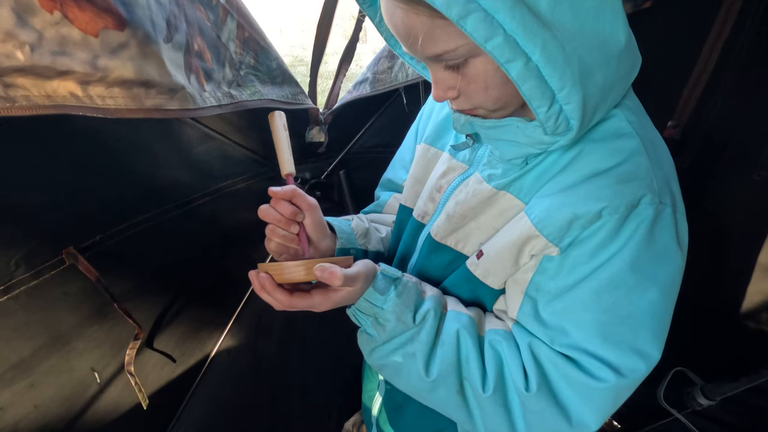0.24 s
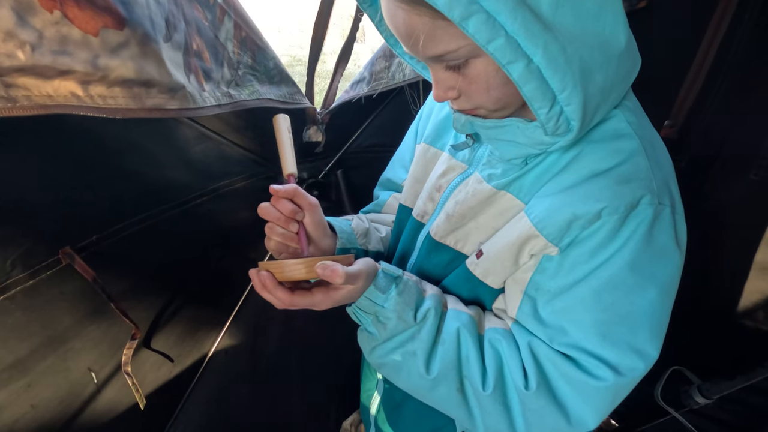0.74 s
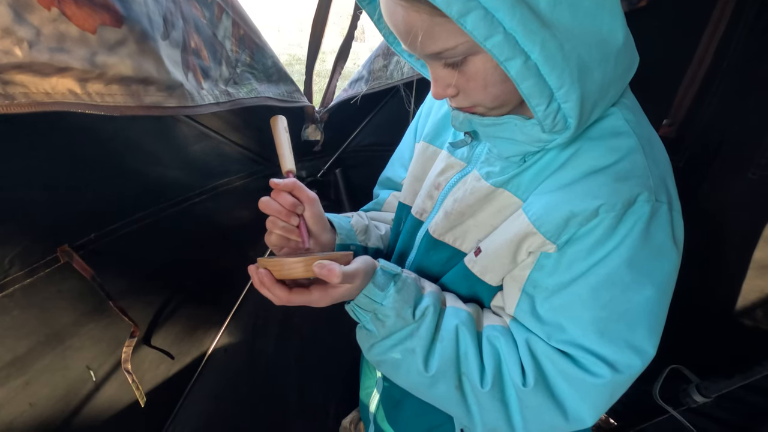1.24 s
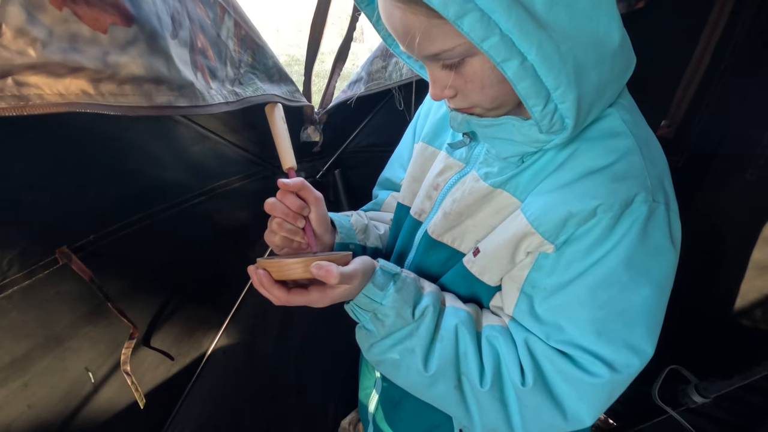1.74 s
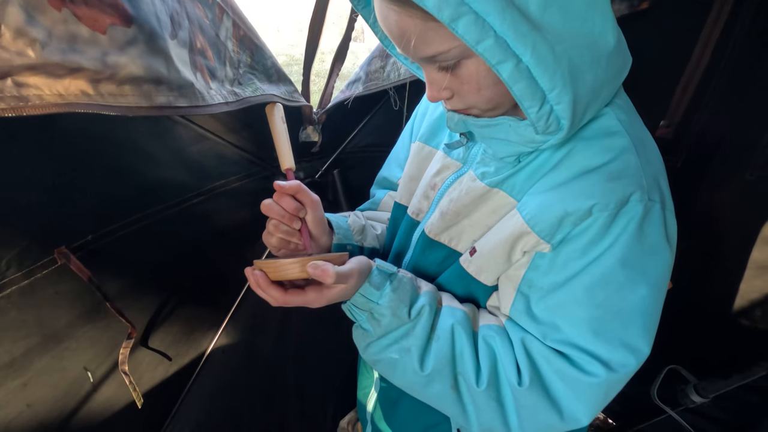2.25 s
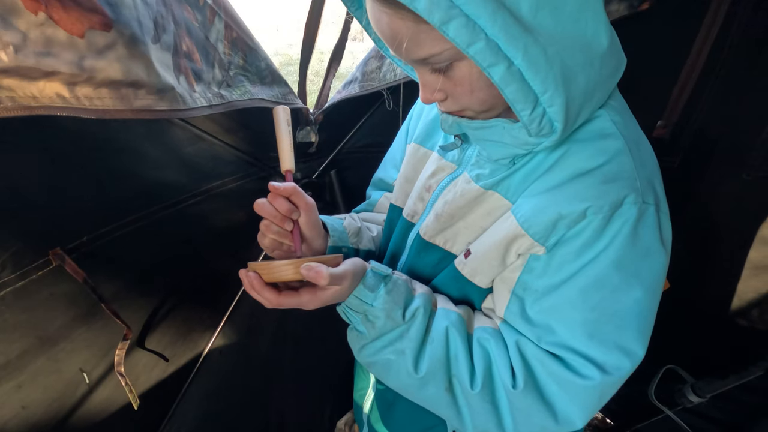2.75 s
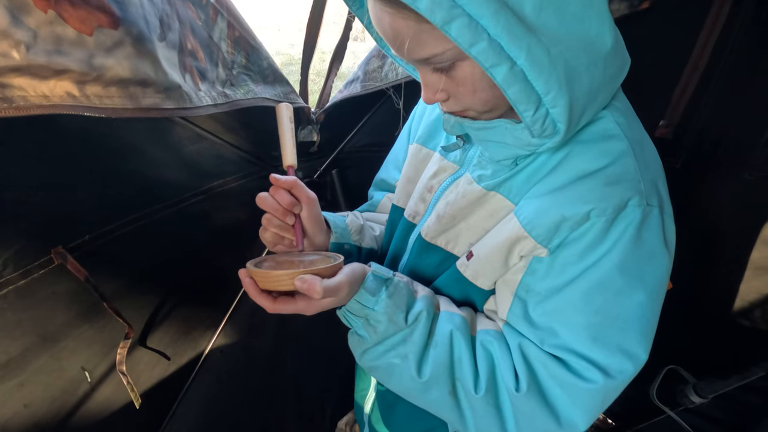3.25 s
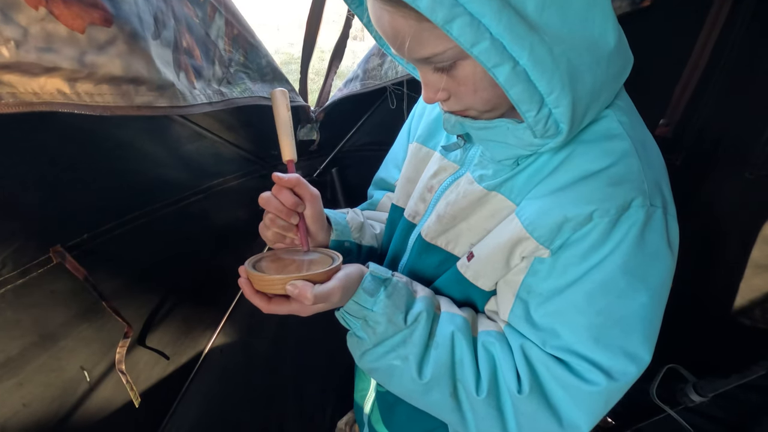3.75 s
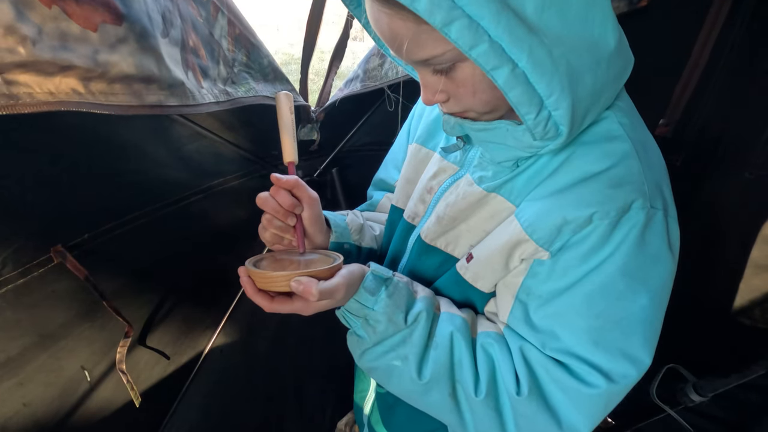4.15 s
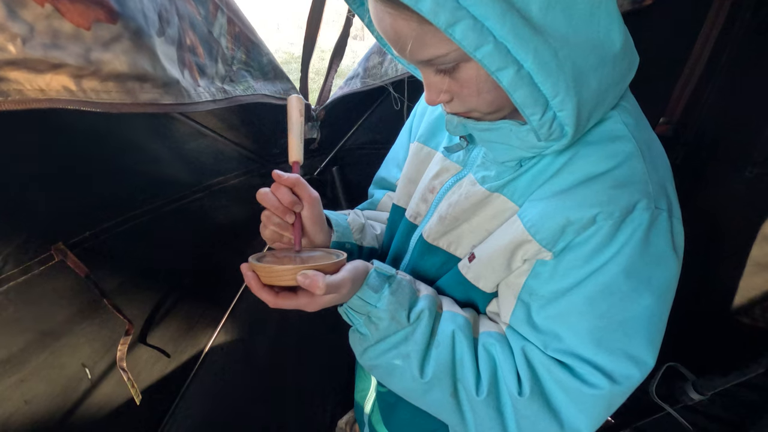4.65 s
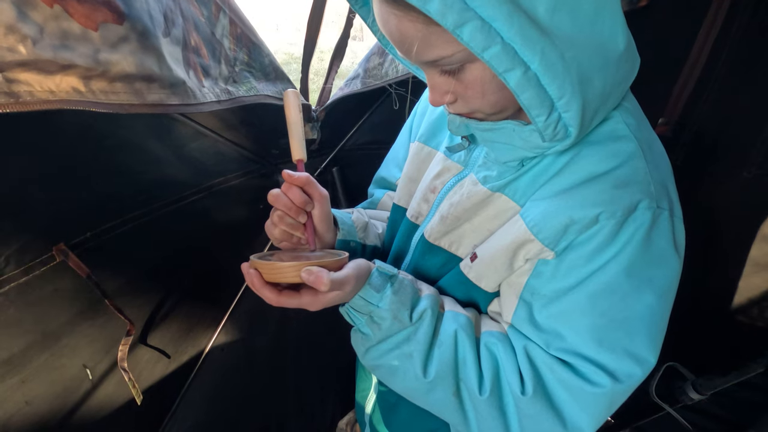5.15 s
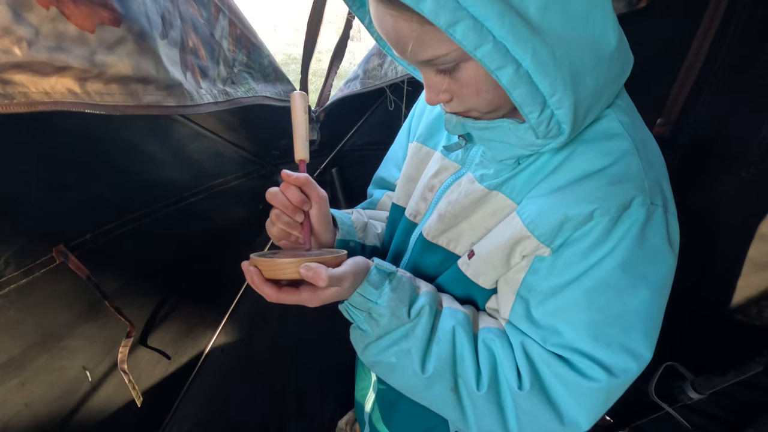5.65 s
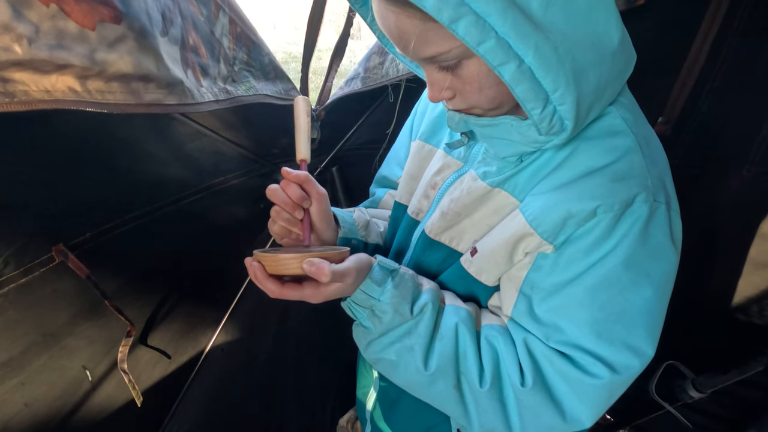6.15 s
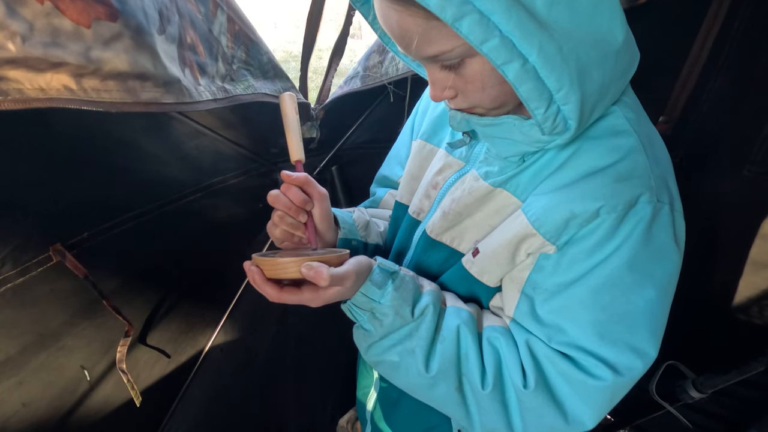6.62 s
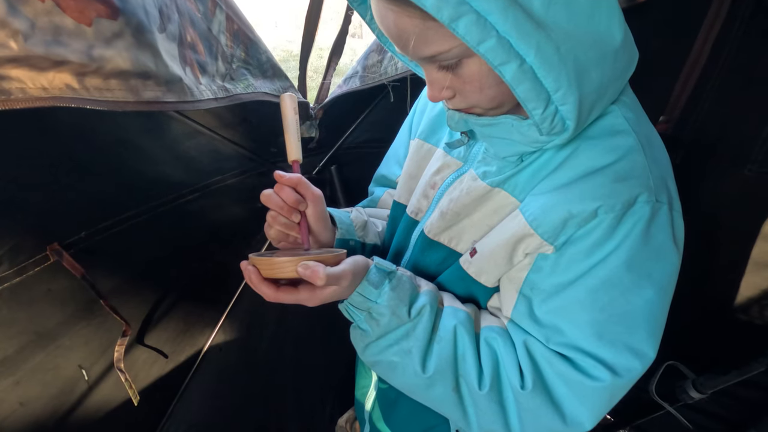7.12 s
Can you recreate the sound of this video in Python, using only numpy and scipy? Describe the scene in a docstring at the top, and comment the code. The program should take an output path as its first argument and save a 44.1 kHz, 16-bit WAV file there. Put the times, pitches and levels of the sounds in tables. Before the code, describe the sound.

A wooden striker scrapes a pot call close by, making raspy turkey-like yelps, then runs of squeaks, clucks and one short whine.

```python
"""Inside a cloth hunting blind, a wooden striker scrapes a round pot call.
Four raspy yelps come first, then runs of squeaks and clucks and one long whine.
The tip sticks and slips; pressing harder slows the slips until they turn ragged, and every slip rings the pot.
A sleeve rustles softly throughout and swells once between two runs, with a few small knocks.
Far bird notes, quiet air and faint wavering hums come from outside."""
import sys
import numpy as np
from scipy import signal
from scipy.fft import rfft, irfft, next_fast_len
from scipy.io import wavfile
from scipy.ndimage import uniform_filter1d

SR = 44100
rng = np.random.default_rng(int(sys.argv[2]) if len(sys.argv) > 2 else 0)


def dump_mix(stems):
    """Bounce the given channels to the path in sys.argv[1] as a 16-bit WAV at rate SR."""
    frames = np.atleast_2d(stems).T  # one column per channel
    limited = np.clip(frames, -1, 1)  # hard clip at full scale
    pcm = np.round(limited * 32767).astype(np.int16)
    wavfile.write(sys.argv[1], SR, pcm)


N = 325458  # length in samples
EDGE_HZ = 13900  # upper limit of the sound


def gain_of(db):
    """Turns decibels into a factor."""
    return 10 ** (np.asarray(db) / 20)


def evened(x):
    """Scales a sound to an rms of 1."""
    return x / np.sqrt(np.mean(x ** 2) + 1e-20)


def read(points, hz):
    """Reads a table of (frequency, value) between its points, on a log-frequency axis."""
    f, value = np.transpose(points)
    return np.interp(np.log(hz + 1), np.log(f + 1), value)


def tinted(x, colour):
    """Colours a sound with a table of (f/Hz, gain/dB)."""
    size = next_fast_len(len(x) + 512)
    gain = gain_of(read(colour, np.fft.rfftfreq(size, 1 / SR)))
    return irfft(rfft(x, size) * gain, size)[:len(x)]


def add(mix, s, sound):
    """Adds a sound into the mix at time s, in seconds."""
    part = mix[max(round(s * SR), 0):][:len(sound)]
    part += sound[:len(part)]


def band_noise(n, hz, octaves):
    """Noise of rms 1 in a soft band around hz."""
    away = np.log2((np.fft.rfftfreq(n, 1 / SR) + 1) / hz) / octaves
    return evened(irfft(rfft(rng.standard_normal(n)) / (1 + away ** 4), n))


def outdoors(side_db=-9, waver=0.016):
    """Quiet air is coloured noise; far hums are sine tones that waver in pitch and strength."""
    # colour of the air: (f/Hz, density/dB)
    air_colour = [(15, -33), (25, 4.5), (52, -4), (91, -9), (168, -7), (326, -18.5), (703, -26), (802, -32),
                  (1100, -23), (2190, -40), (7000, -55), (10000, -64.5), (14000, -68)]
    air_db = -69
    # distant hums: (start/s, end/s, f/Hz, level/dB)
    hum_list = [(2.201, 4.194, 73.5, -64), (3.701, 5.378, 74.85, -70.5), (5.538, 6.206, 76.5, -72.5),
                (1.699, 2.714, 153.6, -73.5), (2.146, 2.708, 454, -74), (6.462, 6.851, 498, -83)]
    colour = gain_of(read(air_colour, np.fft.rfftfreq(N, 1 / SR)))
    air = irfft(rfft(rng.standard_normal((2, N))) * colour, N)
    mid, side = gain_of(air_db) * evened(air)
    for start, end, hz, db in hum_list:
        n = int((end - start) * SR)
        wavering_hz = hz * (1 + waver * band_noise(n, 15, 0.75))
        tone = np.sin(2 * np.pi * np.cumsum(wavering_hz) / SR)
        strength = (1 + .35 * band_noise(n, 6, 1.0)) * signal.windows.tukey(n, .5)
        add(mid, start, gain_of(db) * evened(tone * strength))
    side = gain_of(side_db) * side
    return np.array([mid + side, mid - side])  # left, right


def whistle(length, hz_in, hz_mid, hz_out):
    """A soft bird note: a sine on a bent, slightly shaky pitch."""
    u = np.linspace(-1, 1, int(length * SR))
    hz = hz_mid + (hz_out - hz_in) / 2 * u + ((hz_in + hz_out) / 2 - hz_mid) * u ** 2
    hz = hz * (1 + .012 * band_noise(len(u), 120, 1.2))
    return evened(np.sin(2 * np.pi * np.cumsum(hz) / SR) * signal.windows.tukey(len(u), .35))


def birds(chip_spread_db=2, direct_db=-4):
    """Far birds, smeared by the trees: falling notes and evenly spaced chips."""
    # single notes: (start/s, length/s, start f/Hz, middle f/Hz, end f/Hz, level before smearing/dB)
    note_list = [(3.12, .13, 2950, 2680, 2480, -67), (3.39, .13, 2830, 2620, 2420, -70),
                 (5.26, .11, 3050, 2820, 2830, -72)]
    # a second bird's runs of arched chips: (first chip t/s, last chip t/s, mean level before smearing/dB)
    chip_runs = [(4.867, 5.475, -74), (6.332, 6.70, -74.5)]
    chip_gap_s = .122
    notes, chips = np.zeros(N), np.zeros(N)
    for s, length, hz_in, hz_mid, hz_out, db in note_list:
        add(notes, s, gain_of(db) * whistle(length, hz_in, hz_mid, hz_out))
    for first, last, db in chip_runs:
        for s in np.arange(first, last + chip_gap_s / 2, chip_gap_s):
            chip = whistle(rng.uniform(.035, .05), 2440, 2690, 2380)
            chip_db = db + chip_spread_db * rng.standard_normal()
            add(chips, s - len(chip) / SR / 2, gain_of(chip_db) * chip)
    # the echo is fading noise that would drop 60 dB in 0.7 s, cut off after half a second
    t = np.arange(SR // 2) / SR
    trees = rng.standard_normal(len(t)) * gain_of(-60 * t / .7)
    echo = signal.fftconvolve(notes + chips / 4, trees / np.linalg.norm(trees))[:N]
    return gain_of(direct_db) * (notes + chips) + echo


def handling(sleeve_db=-72, knock_decay_s=0.0085):
    """Dull knocks are short noise bursts; a sleeve brushing as the pot is tilted is swelling noise."""
    # small knocks of hand and pot: (t/s, level before rise and decay/dB, centre f/Hz)
    knock_list = [(1.543, -70, 1398), (3.301, -58.5, 3200), (5.118, -55, 232), (5.177, -56, 180),
                  (5.242, -63, 230)]
    out, t = np.zeros(N), np.arange(SR // 10) / SR
    for s, db, hz in knock_list:
        rise = 1 - np.exp(-t * hz)
        decay = np.exp(-t / knock_decay_s * np.sqrt(hz / 1000))  # higher knocks die sooner
        add(out, s, gain_of(db) * band_noise(len(t), hz, 0.78) * rise * decay)
    brush = np.interp(np.arange(N) / SR, [3.2, 3.31, 3.45, 3.62], [0.21, 1, 0.68, 0.26])
    return out + gain_of(sleeve_db) * brush * band_noise(N, 2100, 1.8)


def pot_ring():
    """The pot's answer to one slip, built from its resonances so that nothing sounds before the slip."""
    # broad response of pot and striker together: (f/Hz, gain/dB)
    body_curve = [(300, -51.5), (480, -43), (640, -41), (815, -37), (1230, -21), (1480, -8.5), (2020, -8),
                  (2250, -18.5), (3450, -28.5), (4700, -20.5), (5600, -32.5), (7900, -41), (9100, -55),
                  (10200, -53), (13500, -60.5)]
    # resonances rising over that curve: (f/Hz, width/Hz, rise/dB)
    resonances = [(685, 15, 3.5), (1008.3, 64, 24.5), (1583, 140, 14), (1795.4, 99, 15), (2170, 210, 5.5),
                  (2250, 70, 6), (2531, 80, 15), (2794, 88, 9.5), (3205, 15, 6), (3912, 150, 9),
                  (4395, 80, 13.5), (7700, 160, 8.5)]
    size = 8192
    hz = abs(np.fft.fftfreq(size, 1 / SR))
    peaks = sum((gain_of(db) ** 2 - 1) / (1 + (2 * (hz - f) / w) ** 2) for f, w, db in resonances)
    log_gain = np.log(gain_of(read(body_curve, hz)) * np.sqrt(np.maximum(1 + peaks, .1)))
    # this phase (minimum phase) packs the sound as early as it can be
    spectrum = np.exp(np.conj(signal.hilbert(log_gain)))
    return np.fft.ifft(spectrum).real[:size // 2]


def slip_train(t, hz, rough, jitter=0.12, uneven=0.26, alternate=0.42):
    """Stick-slip pulses: the rougher the stroke, the more the slips differ in length, force and shape."""
    cycle = np.cumsum(hz) / SR
    slips = np.arange(int(cycle[-1]) + 2)
    # one random value per slip, joined by straight lines
    late, force = (np.interp(cycle, slips, rng.standard_normal(len(slips))) for _ in range(2))
    unsteady = np.interp(rough, [0, .08, .25], [.3, .8, 1.1])
    grain = unsteady * (.015 * late + .007 * band_noise(len(t), 70, 1.2))
    turns = np.cumsum(hz * (1 + grain + jitter * rough ** 2 * late)) / SR
    # a pulse train is a sum of cosines at every multiple k of the slip rate
    k = np.arange(1, int(EDGE_HZ / hz.min()) + 1)[:, None]
    # changes of shape make the upper partials waver on their own
    waver = np.array([band_noise(next_fast_len(len(t)), 50, 1.2)[:len(t)] for _ in k])
    shape = 1 + .5 * unsteady * waver * (1 - np.exp(-(k * hz / 3500) ** 2))
    pulses = (np.cos(2 * np.pi * k * turns) * shape * (k * hz < EDGE_HZ)).sum(0)
    # under a rough stroke, strong and weak slips tend to take turns
    strength = 1 + rough * (uneven * force + alternate * np.cos(np.pi * turns))
    return turns, evened(pulses) * strength


def scrape(ring, t, hz, level_db, rough, treble_db, grit_db=-21, rasp_db=-10, grit_treble_db=6,
           flutter_db=2.0, swell_s_per_db=0.001):
    """One stroke: slips and the grit that each one drags, rung through the pot."""
    # colours of a light, fast squeak, a slow, heavy rasp and a pressed, even stroke: (f/Hz, gain/dB)
    light_colour = [(950, 7.5), (1450, -19.5), (1950, 0.5), (2900, -7), (3900, -12.5), (4900, -9),
                    (6000, -6.5), (7800, -3.5), (12000, 2)]
    heavy_colour = [(1000, 2), (1500, -7), (1850, 4), (2100, -10.5), (2600, 3), (4400, 0), (6000, -3.5),
                    (13000, -1)]
    pressed_colour = [(700, 9), (1000, -3.5), (1400, -1.5), (2100, 1), (2700, 0.5), (3500, 2.5), (4500, 1),
                      (8000, -0.5)]
    turns, pulses = slip_train(t, hz, rough)
    # the grit is strongest at the start of each slip cycle
    grit = rng.standard_normal(len(t)) * evened(0.59 + np.exp(-(turns % 1) / 0.93))
    grit = tinted(grit, [(1200, -3.4), (4500, grit_treble_db)])
    loose = np.interp(rough, [0, .1], [.35, 1])
    drive = pulses + (gain_of(grit_db) * loose + gain_of(rasp_db) * rough) * grit
    # the slip rate decides the blend of the three colours
    light = np.clip((hz - 770) / 150, 0, 1)
    heavy = np.clip((680 - hz) / 180, 0, 1)
    pressed_part = (1 - light - heavy) * tinted(drive, pressed_colour)
    drive = pressed_part + light * tinted(drive, light_colour) + heavy * tinted(drive, heavy_colour)
    drive = tinted(drive, [(2100, 0.009), (4000, treble_db), (12000, 1.2 * treble_db)])
    # the faintest strokes are duller above the fundamental
    dull_db = -.3 * np.clip(-21.5 - level_db.mean(), 0, 18)
    drive = tinted(drive, [(1100, 0.0062), (1800, dull_db)])
    # the hand sets the loudness, whichever resonance the slips happen to meet
    rung = signal.fftconvolve(drive, ring)[40:40 + len(t)]
    power = uniform_filter1d(rung ** 2, size=300)
    # a faint stroke grips poorly: it swells in more slowly and flutters more
    faint_db = np.clip(-25.5 - level_db, 0, 18)
    swell_in = np.clip((t - t[0]) / (0.0051 + swell_s_per_db * faint_db[0]), 0, 1)
    grip = swell_in * np.clip((t[-1] - t) / 0.0027, 0, 1)
    flutter = flutter_db * loose * (0.5 + faint_db / 12) * band_noise(len(t), 50, 0.22)
    strength = grip * gain_of(level_db + flutter) / np.sqrt(power + 1e-12)
    return signal.fftconvolve(drive * strength, ring)


def slides(ring):
    """Without pressure the tip does not grip: it only hisses through the pot."""
    # the tip sliding: (start/s, end/s, level/dB)
    slide_list = [(0, 0.057, -64), (.16, 0.405, -63.5), (0.543, 0.709, -59), (.84, .97, -61),
                  (.96, 1.063, -58.5), (1.18, 1.318, -78), (2.74, 2.826, -70.5), (2.92, 3.02, -64.5),
                  (3.214, 3.279, -68.5), (6.214, 6.257, -73), (6.791, 6.992, -74.5)]
    # colour of the hiss: (f/Hz, gain/dB)
    hiss_colour = [(700, -5.5), (1100, -3), (1900, -3), (2600, 0), (3500, -0.5), (6000, 3), (9000, 8)]
    fade_share = 0.63  # share of a slide spent swelling and fading
    out = np.zeros(N)
    for start, end, db in slide_list:
        n = int(max(end - start, .02) * SR)
        hiss = tinted(band_noise(n, 6000, 1.7), hiss_colour) * signal.windows.tukey(n, fade_share)
        add(out, start, gain_of(db) * evened(signal.fftconvolve(hiss, ring)[:n]))
    return out


def clucks(ring):
    """Squeaks and clucks: pressing bends the pitch off that of a light touch, and it springs back at the ends."""
    # (start/s, end/s, middle f/Hz, glide start to end/Hz, level in the middle/dB,
    #  swell start to end/dB, treble at 4 kHz/dB, roughness 0-1)
    stroke_list = [(0.833, 0.863, 819, 21.5, -25.5, -5, -0.5, 0.36),
                   (2.191, 2.241, 1015, -57, -45, 7, 5, 0.17),
                   (2.247, 2.309, 922, 38.5, -42.5, -5.5, 5.5, 0.31),
                   (2.333, 2.35, 938, 150, -37.5, 6, 5.5, 0.2),
                   (2.363, 2.416, 921, 59.5, -33.5, 15.5, 7, 0.22),
                   (2.419, 2.508, 962, 89.5, -28.5, 8.5, 8, 0.16),
                   (2.532, 2.588, 969.5, 0, -21.5, 4, 5.5, 0.1),
                   (2.678, 2.731, 763, 36, -18.5, -1, 2, 0.26), (2.869, 2.927, 717, 80, -20, 1, -1.5, .36),
                   (3.02, 3.074, 688, 109, -23.5, -3.5, -6.5, 0.2),
                   (3.672, 3.682, 874, 49.5, -42, 3.5, -16.5, 0.63),
                   (3.745, 3.779, 890, 104, -65.5, -16, -1, .5),
                   (3.992, 4.027, 1037, 173, -28.5, -3.5, 0.5, 0.04),
                   (4.051, 4.094, 1037, -50.5, -22.5, -2.5, 1, 0.05),
                   (4.141, 4.159, 907, 107.5, -20, 4.5, -4, 0.03),
                   (4.174, 4.204, 927, 22.5, -19.5, 2.5, -2, .08),
                   (4.236, 4.284, 962, 92, -19, -1, 0, 0.07), (4.315, 4.369, 971, 50, -19, -2.5, 2, 0.1),
                   (4.419, 4.489, 867, -22, -18.5, -3.5, -1, 0.19),
                   (4.536, 4.589, 767, -39, -19, -6, 0, 0.16),
                   (4.642, 4.691, 708.4, 29, -21.5, -2, -0.5, 0.21),
                   (4.763, 4.775, 814, -61, -35, -4.5, -2, 0.37),
                   (5.47, 5.559, 1037, 87, -41.5, 13.5, 4, 0.09),
                   (5.568, 5.626, 955, -160, -30.5, -1, 0.5, 0.13),
                   (5.659, 5.706, 921.4, 15.5, -23.5, 3, -2.5, 0.09),
                   (5.705, 5.733, 875, -2, -20.5, 2.5, -4, 0.01),
                   (5.758, 5.812, 738.5, 2.5, -20.5, -2.5, -6.5, 0.07),
                   (6.79, 6.85, 984, -120, -54.5, 2.5, -6.5, 0.04),
                   (6.969, 6.985, 896, -14, -46, 3, -2, 0.17),
                   (7.002, 7.081, 902.4, 100, -35, 6.5, 3, 0.32),
                   (7.074, 7.229, 970, 36, -30, 0.5, 3.5, 0.09),
                   (7.24, 7.261, 960, 16, -30, -11.5, 1, 0.02), (7.269, 7.32, 975, 106, -28, 6, 4.5, 0.06),
                   (7.349, 7.4, 958, -92.5, -31, -14, 3.5, 0.02)]
    free_hz, full_sag_hz = 972, 250  # pitch of a light touch, and how far full pressure lowers it
    spring_back, bend_power = 0.92, 2.3  # share of the sag undone at the ends, and how late it bends
    sag_skew = 1.12  # above 1 the pitch sinks more slowly than it springs back
    ends_db, press_ends_db = -3, 4.5  # a light stroke is loudest in its middle, a pressed one at its ends
    out = np.zeros(N)
    for start, end, hz_mid, glide_hz, db, swell_db, treble_db, rough in stroke_list:
        t = np.arange(start, max(end, start + 0.01), 1 / SR)
        u = 2 * np.linspace(0, 1, len(t)) ** sag_skew - 1  # -1 at the start, 1 at the end
        sag_hz = free_hz - hz_mid
        pressure = max(sag_hz / full_sag_hz, 0)
        hz = hz_mid + glide_hz * u / 2 + spring_back * sag_hz * abs(u) ** bend_power
        level = db + swell_db * u / 2 + (ends_db + press_ends_db * pressure) * u ** 2
        add(out, start, scrape(ring, t, hz, level, rough, treble_db))
    return out


def whine(ring, treble_db=-2, trim_db=0.5, overhang_s=0.0022):
    """One long pressed stroke whose slips quicken wherever the hand eases."""
    # path of the whine: (t/s, slip rate f/Hz, level before the trim/dB)
    path = [(5.85, 711, -21.5), (5.88, 681.5, -26.5), (5.892, 703, -25), (5.912, 791, -19.5),
            (5.938, 706.8, -25.5), (6.044, 702, -27.5), (6.074, 750.2, -20.5), (6.114, 720, -24.5),
            (6.168, 704, -31), (6.178, 757.4, -27.5), (6.186, 866, -27)]
    # it starts rough, then the tip settles
    settled_rough, catch_rough, catch_s = 0.036, 0.5, 0.019
    out = np.zeros(N)
    s, hz, db = np.transpose(path)
    t = np.arange(s[0] - overhang_s, s[-1] + overhang_s, 1 / SR)
    hz, db = (np.interp(t, s, column) for column in (hz, db))
    rough = settled_rough + catch_rough * np.exp(-(t - t[0]) / catch_s)
    add(out, t[0], scrape(ring, t, hz, db + trim_db, rough, treble_db))
    return out


def yelps(ring, treble_db=-1.5):
    """A falling squeal drops into a rasp, each step locking to a slower share of the pot's ring."""
    # (start/s, tip bites t/s, turns ragged t/s, hand lets go t/s, fade length/s, level once bitten/dB,
    #  roughness of the bite 0-1)
    yelp_list = [(0.045, 0.084, 0.13, 0.18, .008, -16, 0.24), (0.392, 0.42, 0.45, 0.49, .035, -18, 0.36),
                 (0.696, .728, .755, .823, .014, -17, 0.6), (1.055, 1.075, 1.076, 1.1774, .032, -15, 0.42)]
    # the slips lock to every 2nd, 3rd, 4th, then 5th swing of the pot's main resonance as the hand bears down
    lock_hz, ragged_lock_hz, jump_s = 1868, 1808, .007
    squeal_glide = .7  # share of the opening squeal spent sliding from the 2nd swing to the 3rd
    # against the yelp's level:
    squeal_start_db, squeal_end_db, tire_db, fade_db = -12, -5.5, -4, -27
    squeal_rough, ragged_rough, last_rough = 0.072, 0.48, .9
    out = np.zeros(N)
    for start, bite, ragged, let_go, fade, db, bite_rough in yelp_list:
        t = np.arange(start, let_go + fade, 1 / SR)
        # each of these steps goes from 0 to 1
        squeal = np.clip((t - start) / (squeal_glide * (bite - start)), 0, 1)
        bitten, torn = (np.clip((t - s) / jump_s + .5, 0, 1) for s in (bite, ragged))
        hz = (lock_hz + (ragged_lock_hz - lock_hz) * torn) / (2 + squeal + bitten + torn)
        opening = np.interp(t, [start, bite], [squeal_start_db, squeal_end_db])
        ending = np.interp(t, [ragged, let_go, let_go + fade], [0, tire_db, fade_db])
        level = db + (1 - bitten) * opening + ending
        rough = squeal_rough + (bite_rough - squeal_rough) * bitten
        torn_rough = np.interp(t, [ragged, let_go], [ragged_rough, last_rough])
        rough = rough + (torn_rough - rough) * torn
        add(out, start, scrape(ring, t, hz, level, rough, treble_db))
    return out


def blind(x, tail_db=-22):
    """Quick bounces off hands, jacket and cloth walls, strongest in the treble, with a short tail."""
    # how long the tail takes to fade by 60 dB: (f/Hz, fade time/s)
    fade_times = [(300, .15), (1000, .14), (2000, .15), (4500, .15), (7700, .18), (12000, .11)]
    # colour of the tail: (f/Hz, gain/dB)
    tail_colour = [(600, -7.5), (1000, 1), (1850, -0.5), (2600, 10), (3600, 8.5), (4600, 7), (6000, 8),
                   (12000, 3)]
    n = SR // 3
    t = np.arange(n) / SR
    # about 4000 random clicks a second, from 2 ms on
    taps = rng.choice([-1., 1.], (2, 2, n)) * (rng.random((2, 2, n)) < 4000 / SR) * (t > .002)
    # left and right share most clicks; the rest enter with opposite signs
    early, late = taps[:, :1] + np.array([[.4], [-.4]]) * taps[:, 1:]
    early = early * gain_of(-60 * t / .05)
    bounce = [(1000, -19), (2000, -15), (3500, -8), (8000, -6)]  # (f/Hz, gain/dB)
    early = np.array([tinted(side, bounce) for side in early / np.linalg.norm(early[0])])
    # each frequency of the tail fades at its own speed
    hz, frame_s, z = signal.stft(late, SR, nperseg=256)
    fading = gain_of(-60 * frame_s / read(fade_times, hz)[:, None])
    late = signal.istft(z * fading, SR, nperseg=256)[1][:, :n]
    late = np.array([tinted(side, tail_colour) for side in late / np.linalg.norm(late[0])])
    return signal.fftconvolve(x[None], early + gain_of(tail_db) * late, axes=1)[:, :N]


def ports(pair):
    """The two microphones hear the call with slightly different phase and level."""
    # phase by which left leads: (f/Hz, lead/rad)
    phase_lead = [(100, 0), (1000, -.38), (1400, -.1), (1800, -.5), (2700, -.75), (4500, -.6), (7700, -.55),
                  (9000, -.1)]
    # level of left minus right: (f/Hz, difference/dB)
    level_gap = [(60, 1), (130, 2.5), (280, -1.5), (620, -0.5), (1350, 2.5), (2940, 2.0), (6410, 2),
                 (14000, 3.5)]
    size = next_fast_len(N)
    hz = np.fft.rfftfreq(size, 1 / SR)
    # left takes half of each difference, right the opposite half
    half = gain_of(read(level_gap, hz) / 2) * np.exp(.5j * read(phase_lead, hz))
    return irfft(rfft(pair, size) * np.array([half, 1 / half]), size)[:, :N]


def scene():
    """The call in the blind, over the sounds from outside."""
    ring = pot_ring()
    call = yelps(ring) + whine(ring) + clucks(ring) + slides(ring) + handling()
    return ports(call + blind(call)) + birds() + outdoors()


def record(dry):
    """The recorder's band limit: a filter that removes what lies above EDGE_HZ."""
    low_pass = signal.firwin(255, EDGE_HZ, window=("kaiser", 8), fs=SR)
    return signal.oaconvolve(dry, low_pass[None], "same")


dry = scene()
out = record(dry)
dump_mix(out)
```